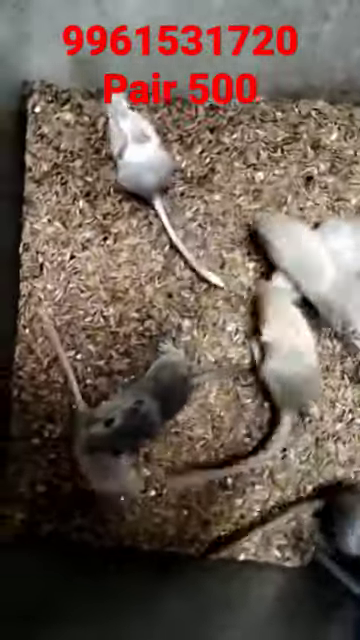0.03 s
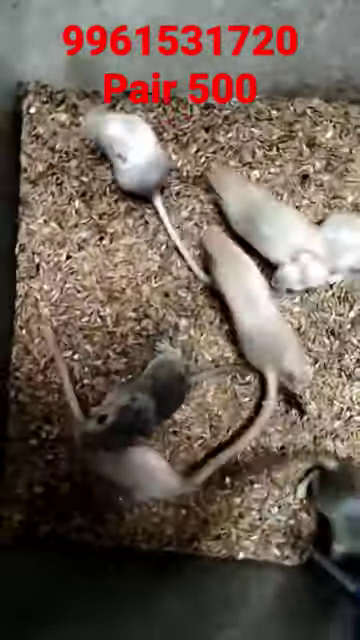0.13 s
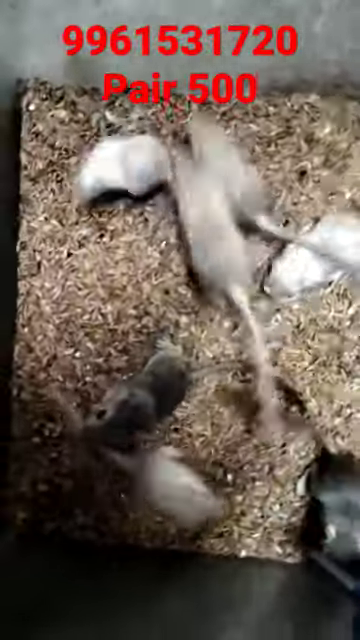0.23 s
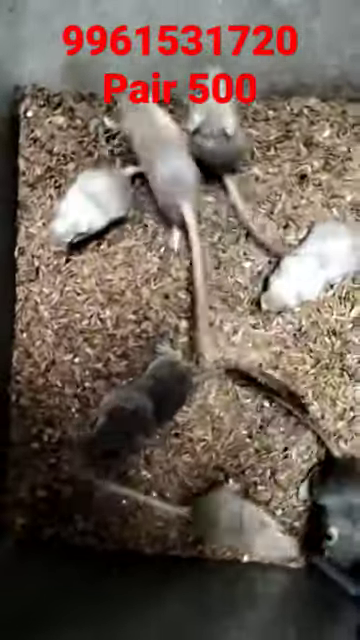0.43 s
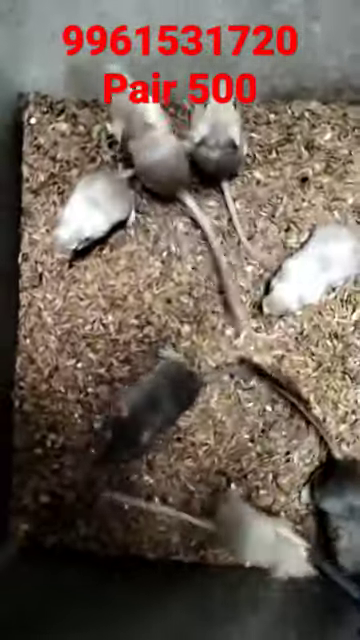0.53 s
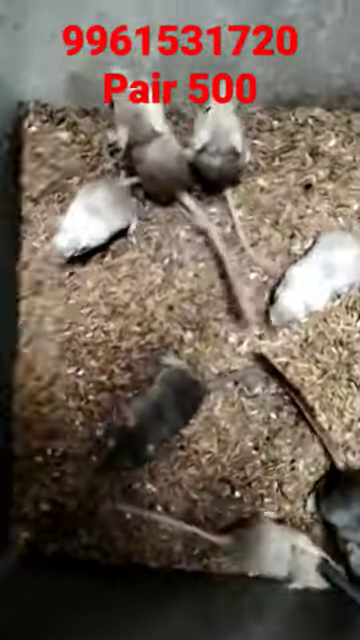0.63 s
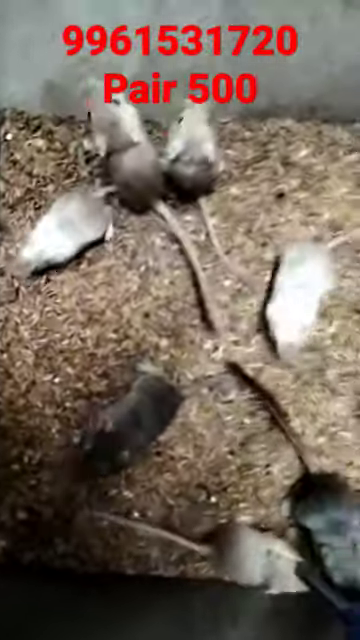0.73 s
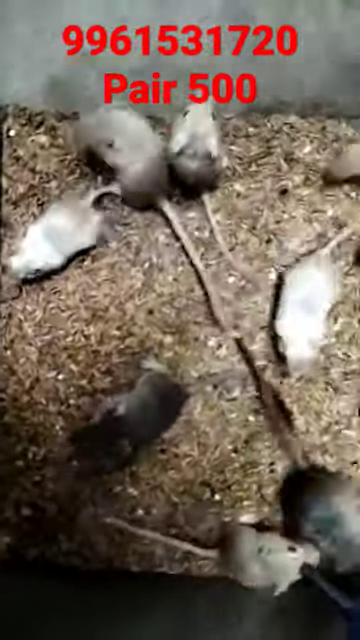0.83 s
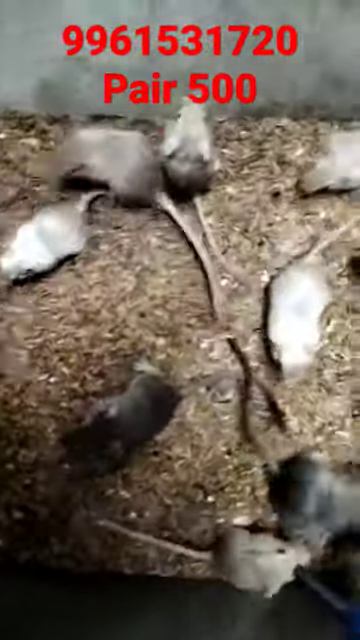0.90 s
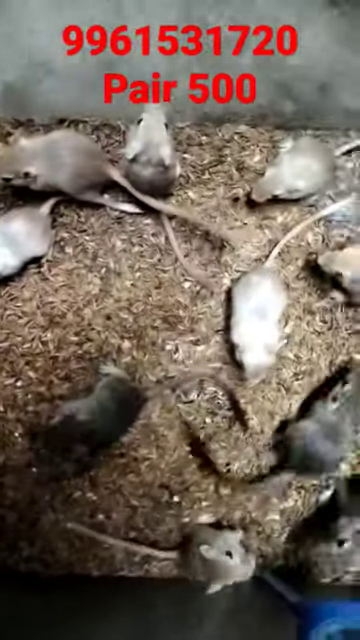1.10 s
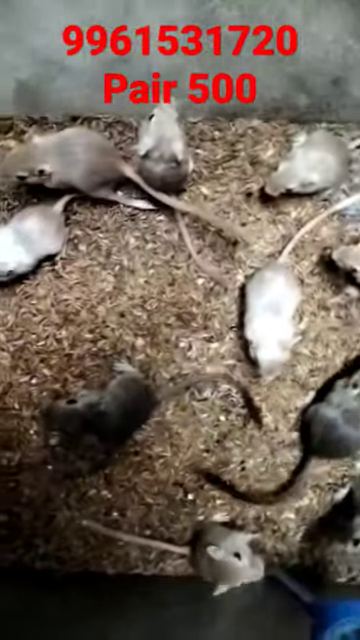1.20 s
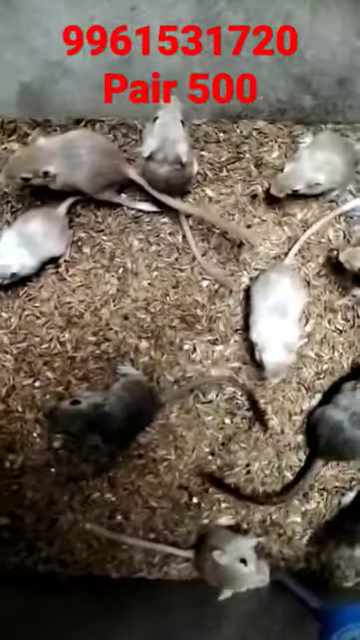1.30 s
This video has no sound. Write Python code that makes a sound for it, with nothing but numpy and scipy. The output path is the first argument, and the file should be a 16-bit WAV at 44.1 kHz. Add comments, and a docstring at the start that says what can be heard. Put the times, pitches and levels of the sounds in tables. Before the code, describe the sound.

Rodents scurry in a thin-walled tub, close by, with wood shavings rustling throughout over a faint hiss. Soft thumps open, then from about 0.2 to 0.5 seconds quick paw knocks ring and briefly rattle the panels. Lighter taps follow. A second, duller flurry comes from 0.8 to 1 second, with a scuff of dragged shavings near 0.9. A few softer thumps and quieter rustling last until about 1.3 seconds.

```python
"""Rodents scurry over wood shavings in a thin-walled tub, close to a two-port (stereo) microphone.
Their paws knock on the tub floor, ring its panels and set off a short rattle; steps cushioned
by the bedding only thump. The shavings rustle throughout, over a faint hiss, and in the
second half the paws drag shavings across the floor with a dull scuff."""
import sys
import numpy as np
from scipy import signal
from scipy.io import wavfile
from scipy.ndimage import uniform_filter1d

SR = 44100
rng = np.random.default_rng(int(sys.argv[2]) if len(sys.argv) > 2 else 0)


def log_audio(samples):
    """Write samples as a 16-bit WAV file to the path given in sys.argv[1]."""
    # one column per channel
    frames = np.atleast_2d(samples).T
    # limit to full scale, then quantise
    limited = np.clip(frames, -1, 1)
    pcm = np.round(limited * 32767).astype(np.int16)
    wavfile.write(sys.argv[1], SR, pcm)


N = 59535  # 1.35 seconds


def amp(db):
    """Turn decibels (dB) into a number to multiply a sound by."""
    return 10 ** (np.asarray(db) / 20)


def unit(x):
    """Scale a signal to an average power of 1."""
    return x / np.sqrt(np.mean(x ** 2) + 1e-20)


def add(mix, start_s, sound):
    """Mix a sound in at its start time."""
    part = mix[max(round(start_s * SR), 0):][:len(sound)]
    part += sound[:len(part)]


def colour(x, points):
    """Make lows and highs louder or softer, following a curve of (Hz, dB) points."""
    point_hz, db = np.transpose(points)
    hz = abs(np.fft.fftfreq(4096, 1 / SR))
    log_gain = np.log(amp(np.interp(np.log(hz + 1), np.log(point_hz), db)))
    response = np.exp(np.conj(signal.hilbert(log_gain)))  # never rings ahead of the sound
    taps = np.fft.ifft(response).real
    return signal.fftconvolve(x, taps[:len(taps) // 2])[:len(x)]


def stereo_noise(count, alike_below_hz=620):
    """Left and right noise, alike in the bass and unrelated in the treble."""
    mid, side = rng.standard_normal((2, count))
    side = signal.sosfilt(signal.butter(1, alike_below_hz, "high", fs=SR, output="sos"), side)
    return np.array([mid + side, mid - side]) / np.sqrt(2)


# The tone of the background. Each row: frequency in Hz, relative level in dB.
HISS_TONE = [(20, -2.5), (50, -23), (95, 2), (160, 10), (260, -18), (450, -19), (1000, -23.5),
             (3000, -24.5), (6000, -33.5), (14000, -44)]

def hiss(level_db=-47):
    """A faint, steady hiss with a low rumble."""
    return amp(level_db) * np.array([unit(colour(noise, HISS_TONE)) for noise in stereo_noise(N)])


# How hard the bedding is stirred. Each row: time in seconds, relative level in dB.
STIRRING = [(0, -54.5), (.04, -59.5), (.135, -53.5), (.184, -57.5), (.248, -53), (.42, -52.5), (.48, -54.5),
            (.538, -50.5), (0.565, -59), (.605, -54), (.69, -56), (0.74, -54.5), (0.786, -61), (.895, -63),
            (0.939, -51), (.97, -54.5), (1.142, -52), (1.183, -62.5), (1.35, -63.5)]
# The tone of the rustle on each side. Each row: frequency in Hz, relative level in dB.
LEFT_TONE = [(200, -11), (600, 2), (1300, 0.5), (2600, 2.5), (4000, -2.5), (5500, -8.5), (7100, -11),
             (8000, -2), (9200, 3), (11500, -3), (14000, -2.5)]
RIGHT_TONE = [(200, -25), (600, -14), (1300, 0.5), (2600, 1.5), (4000, -1), (5500, 0), (7000, 4),
              (8000, -5.5), (8700, -19), (10500, -5), (13000, -2)]

def shavings(boost_db=6, clump_db=1.5, clump_s=0.01, snaps_per_s=2900, snap_share=0.38):
    """Stirred shavings give clumps of tiny snaps and a fine rub."""
    clumps = unit(uniform_filter1d(rng.standard_normal(N), int(clump_s * SR)))
    stir_db = np.interp(np.arange(N) / SR, *np.transpose(STIRRING))
    level = amp(stir_db + boost_db + clump_db * clumps)
    snap_db = np.minimum(rng.exponential(1, N), 4)
    snaps = amp(snap_db) * (rng.random(N) < snaps_per_s / SR)
    out = []
    for tone in (LEFT_TONE, RIGHT_TONE):
        crackle = np.sqrt(snap_share) * unit(snaps * rng.choice([-1, 1], N))
        rub = np.sqrt(1 - snap_share) * rng.standard_normal(N)
        out.append(level * unit(colour(crackle + rub, tone)))
    return np.array(out)


def push(contact_ms):
    """The push of one paw: a short contact knocks, a long, cushioned one thumps."""
    age = np.arange(1500) / SR * 1000 / contact_ms
    force = age * np.exp(-age)
    return force / force.sum()


# Paws landing. Each row: start in seconds, strength in dB, contact time in milliseconds.
PAW_STEPS = [(0.0051, -7, 1.12), (0.0492, -12, 1.34), (0.1935, -8, 1.24), (0.2329, -13, 0.08),
             (0.2482, -3.5, 0.061), (0.2533, -8, 0.14), (0.2655, -8.5, 0.19), (0.3305, 0, 0.15),
             (0.3388, 0.6, 0.13), (0.3477, 0.1, 0.17), (0.3547, -2.5, 0.15), (0.3597, -16, 0.1),
             (0.3895, -11.5, 0.039), (0.4074, -12, 0.11), (0.4391, -9, 0.25), (0.4826, -6, 0.37),
             (0.5059, -9.1, 0.18), (0.5289, -12, 0.66), (0.5745, -15.5, 0.26), (0.6098, -12.5, 0.15),
             (0.6281, -15, 0.11), (0.6953, -20.8, 0.061), (0.7312, -15.5, 0.12), (0.7692, -15, 0.32),
             (0.812, -8, 0.49), (0.841, -1, 0.94), (0.8619, -4.5, 0.83), (0.8914, 4, 1.33),
             (0.9139, -3.5, 0.36), (0.927, -3, 0.56), (0.932, -3, 0.22), (0.9437, -8.5, 0.98),
             (0.9847, -5, 1.37), (1.0162, -3, 1.26), (1.094, -24.5, 0.28), (1.1479, -18.5, 1.04),
             (1.2034, -6.0, 1.1), (1.274, -25, 1.23)]

def paws(patter_db=-30, patter_per_s=70):
    """The force on the tub floor: clear steps over the light, random patter of other animals."""
    patter = rng.standard_normal(N) * (rng.random(N) < patter_per_s / SR)
    force = amp(patter_db) * signal.fftconvolve(patter, push(contact_ms=0.51))[:N]
    for start_s, db, contact_ms in PAW_STEPS:
        add(force, start_s, amp(db) * push(contact_ms))
    return force


# The tub's own notes. Each row: pitch in Hz, relative level in dB, seconds to fade by 60 dB,
# how much louder the left is in dB, how far the left wave is ahead in radians.
PANEL_NOTES = [(100.4, -35, 0.56, -1.5, 0), (131, -40, 0.088, -4, 0), (160.9, -27, 0.55, -1.9, -1),
               (204.3, -32, 0.2, 3, -0.4), (249, -45, 0.14, 10, -3.2), (306.8, -42, 0.74, 7.5, 0.5),
               (336.2, -38, 0.66, 0, 0.5), (376.1, -41, 0.29, 9.5, 1.7), (579.9, -23.5, 0.3, -6, -0.78),
               (651, -34, 0.36, -1.5, 4.5), (691, -39.5, 0.15, -15, 3), (754.4, -31, 0.2, -7.5, 4.5),
               (818, -25, 0.23, 1.2, -3.5), (952.6, -30, 0.2, 16, -1.66), (1037.0, -36, 0.12, 5.5, 4),
               (1188, -23.5, 0.1, -2, 3.5), (1285, -35.5, 0.3, 5, 5), (1389, -34.5, 0.11, 15, -1.5),
               (1857, -39, 0.35, 4, -1.5)]

def tub(force, lowest_hz=74.5):
    """Paws set the panels ringing; each note reaches left and right with its own level and timing."""
    t = np.arange(N) / SR
    out = []
    for side in (.5, -.5):  # left, right
        ring = np.zeros(N)
        for hz, db, fade_s, left_db, lead in PANEL_NOTES:
            level = amp(db + side * left_db - 60 * t / fade_s)
            ring += level * np.sin(2 * np.pi * hz * t + side * lead)
        out.append(signal.fftconvolve(force, ring)[:N])
    # The deep bass below the lowest note is cut away.
    return signal.sosfilt(signal.butter(3, lowest_hz, "high", fs=SR, output="sos"), out)


# The tone of the rattle. Each row: frequency in Hz, boost or cut in dB.
RATTLE_TONE = [(60, -29), (200, 1), (340, -7.5), (470, -26.5), (620, 5.5), (1000, -15), (1520, -9.5),
               (1680, -23.5), (1920, -12.5), (2300, -28), (3400, -15), (6000, -28), (14000, -35)]

def rattle(rise_s=0.0033, fade_s=0.11):
    """Each clear step also starts many brief vibrations in the tub and bedding, blurred into noise."""
    t = np.arange(SR // 4) / SR
    shape = (1 - np.exp(-t / rise_s)) * amp(-60 * t / fade_s)
    out = np.zeros((2, N))
    for start_s, db, contact_ms in PAW_STEPS:
        for channel, noise in zip(out, stereo_noise(len(t))):
            add(channel, start_s, amp(db) * signal.fftconvolve(noise * shape, push(contact_ms)))
    return np.array([colour(channel, RATTLE_TONE) for channel in out])


# How the scuff swells and fades. Each row: time in seconds, level in dB.
SCUFF_LEVELS = [(0, -83), (.7, -57), (.8, -55.5), (0.906, -52), (.938, -37), (.965, -53), (1.1, -79)]
# The tone of the scuff. Each row: frequency in Hz, relative level in dB.
SCUFF_TONE = [(80, -1), (220, 11.5), (470, -21), (660, 11.5), (850, -5.5), (1520, 2.5), (1670, -18),
              (1880, 4.5), (2150, -9), (3500, -7), (7000, -17), (14000, -26)]

def scuffing():
    """Paws drag shavings across the tub floor with a dull rub."""
    level = amp(np.interp(np.arange(N) / SR, *np.transpose(SCUFF_LEVELS)))
    return level * np.array([unit(colour(noise, SCUFF_TONE)) for noise in stereo_noise(N)])


def scene():
    """Add up the sounds of the paws, the bedding and the background."""
    return tub(paws()) + rattle() + scuffing() + shavings() + hiss()


def record(dry):
    """Cut away the very highest treble."""
    top_hz = 14330
    taps = signal.firwin(511, top_hz, window=("kaiser", 9), fs=SR)
    return signal.oaconvolve(dry, taps[None], "same")


dry = scene()
out = record(dry)
log_audio(out)
```